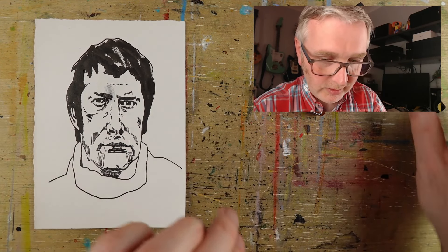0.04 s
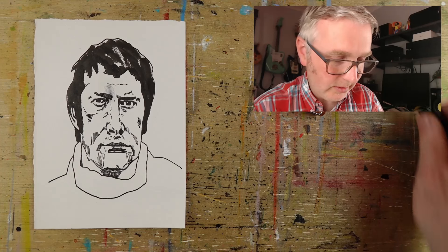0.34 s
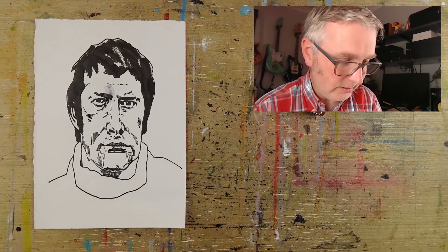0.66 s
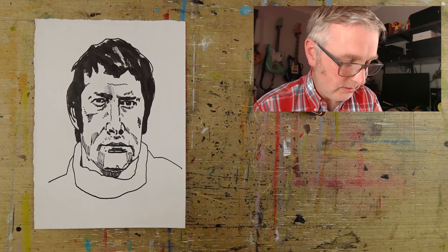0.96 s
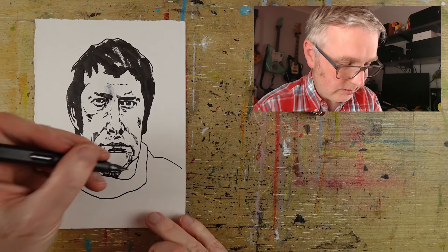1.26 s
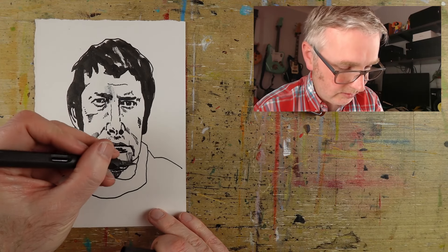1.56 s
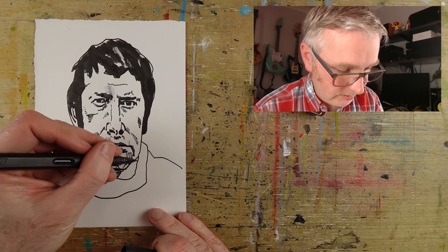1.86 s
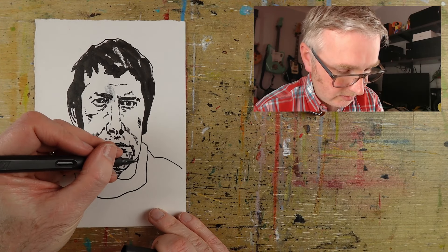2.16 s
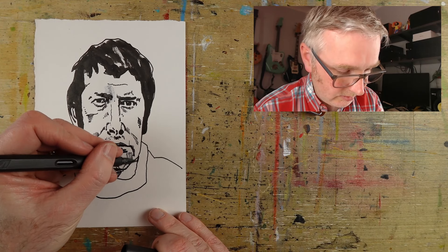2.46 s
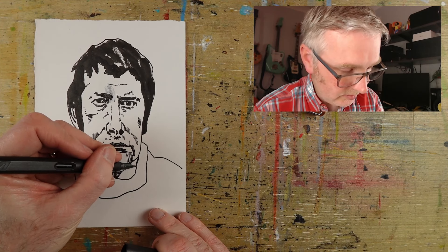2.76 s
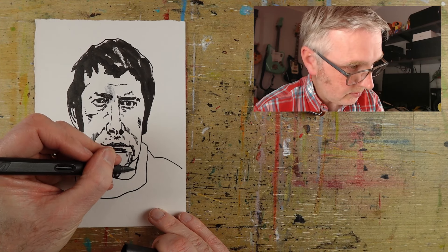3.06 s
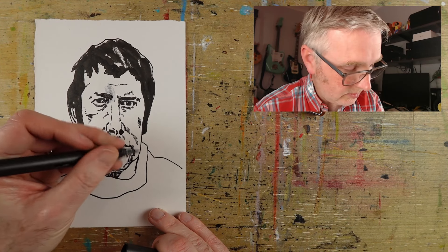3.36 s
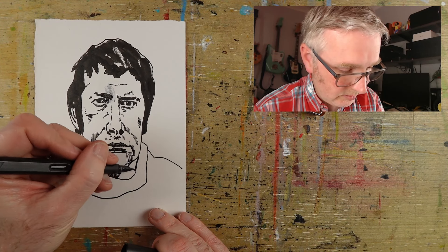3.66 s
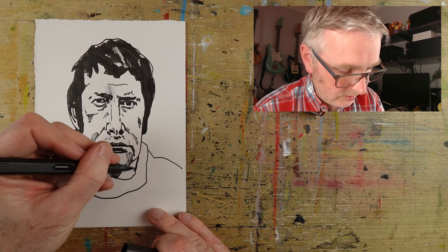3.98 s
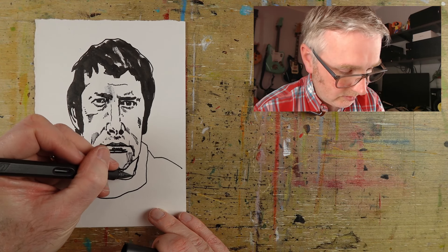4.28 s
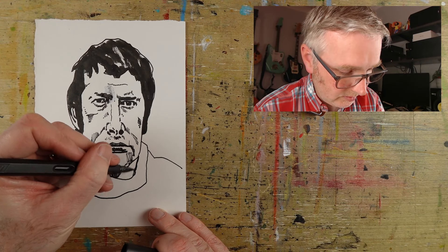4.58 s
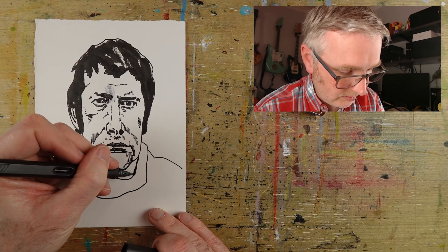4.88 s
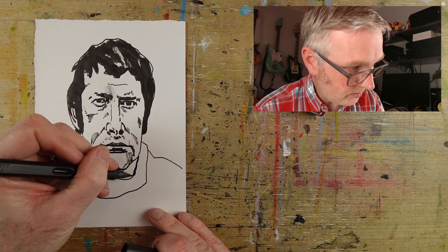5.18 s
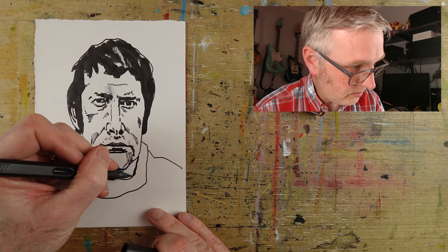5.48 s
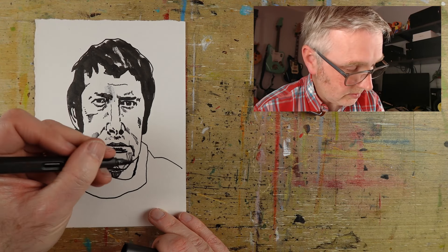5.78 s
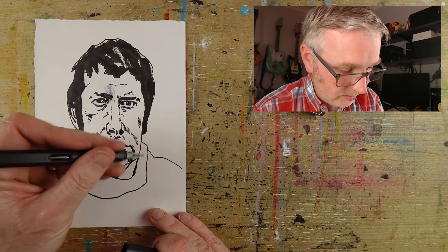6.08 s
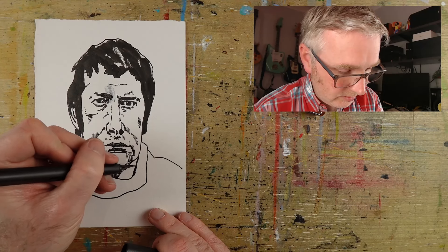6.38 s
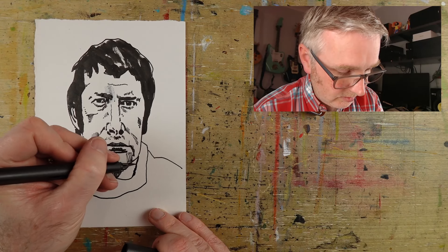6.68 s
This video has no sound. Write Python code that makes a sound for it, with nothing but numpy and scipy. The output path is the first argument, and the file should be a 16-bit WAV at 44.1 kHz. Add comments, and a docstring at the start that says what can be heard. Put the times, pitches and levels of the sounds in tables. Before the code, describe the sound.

Close by in a small, quiet room, a dropped pen bounces and rattles briefly on a wooden desk. Soft rustling of hands and small plastic clicks lead to the crisp snap of a pen cap coming off. Then the nib works on paper in brief, uneven scratches, mixed with soft knocks on the wood beneath. A clock ticks barely audibly over a low, steady room hush.

```python
"""A small quiet room with a wooden desk, a sheet of paper on it and a faintly ticking clock. A pen clatters
onto the desk, hands brush about, plastic clicks in the fingers and another pen is uncapped with a pop and its
cap set down. The hand settles on the sheet, then the nib lands and draws in short strokes: it catches on the
paper's fibres, and these tiny tugs make the desk top sound with it."""
import sys
import numpy as np
from scipy import signal
from scipy.fft import rfft, irfft
from scipy.io import wavfile

SR = 44100
rng = np.random.default_rng(int(sys.argv[2]) if len(sys.argv) > 2 else 0)


def to_wav(s):
    """Save 16-bit WAV."""
    ch = np.atleast_2d(s).T  # columns
    pcm = np.round(np.clip(ch, -1, 1) * 32767)  # PCM
    wavfile.write(sys.argv[1], SR, pcm.astype(np.int16))


N = 301644
TIME = np.arange(N) / SR

# A spectrum says how strong lows and highs are. A resonance is a pitch that a thing likes to ring at.
# the room's steady background: (frequency [Hz], level [dB])
ROOM_SPECTRUM = [(15, -68.5), (25, -22), (55, -7), (102, -3), (249, -7), (285, -4), (309, -15), (344, -12),
                 (560, -16), (911, -17), (988, -20.5), (2610, -17), (2840, -18), (3160, -21), (16000, -31)]
# pitches that stand out of it: (frequency [Hz], width [Hz], boost [dB])
ROOM_RESONANCES = [(73.3, 9.9, 7), (284, 50, 2), (2770, 130, 4.5), (4070, 400, 3), (5700, 540, 3.5)]
# hands and sleeves slide: (time [s], half width [s], soft rub level [dB], dry hiss level [dB])
HAND_MOVES = [(.02, 0.17, -69, -66.5), (.5, 0.13, -61, -62.5), (.615, 0.0057, -70, -59),
              (.646, 0.0095, -68, -49), (.92, .11, -63.5, -63), (1.12, 0.067, -74, -67.5),
              (1.33, 0.052, -67.5, -68.5), (1.917, .015, -68.5, -65.5), (2.915, .012, -68, -67),
              (3.331, 0.062, -68.5, -71.5), (5.92, 0.012, -66, -68), (5.991, 0.019, -59, -60.5),
              (6.165, 0.033, -67, -61), (6.27, 0.027, -71.5, -77)]
# rubbing skin and cloth: (frequency [Hz], level [dB])
RUB_SPECTRUM = [(290, -29), (500, -3), (919, -7), (1300, -9), (1720, -4.5), (5470, -5.5), (6510, -1.5),
                (13600, -7), (16000, -11.5)]
# the dropped pen hits the desk: (time [s], strength [dB])
BOUNCES = [(.154, -6.5), (.1621, -4), (.1642, 2.5), (.177, -5.5), (.186, -4), (.2006, -8), (.2045, -6.5),
           (.2162, -9.5), (.247, -22.5), (.271, -17.5)]
# the short crack of a bounce: (frequency [Hz], level [dB])
CRACK_SPECTRUM = [(29, -42.5), (50, -8.5), (75, -11), (163, -8.5), (345, -3), (507, -8.5), (927, -3),
                  (1120, -11), (1540, -7), (3500, -16.5), (3950, -14.5), (4240, -18), (16000, -38)]
# pen and desk ring on: (frequency [Hz], level [dB], time to fade by 60 dB [s])
BOUNCE_RINGS = [(71.6, -19, 0.77), (136.6, -26.5, 0.38), (254, -21, 0.37), (340.7, -12.5, 0.28),
                (474, -11.5, 0.21), (570, -8.5, 0.076), (639, -8.5, 0.1), (721, -8.5, 0.14),
                (799, -5, 0.099), (917, -14, 0.29), (940, -20, 0.14), (1037, 0, 0.091), (1056, -13, 0.06),
                (1398, -8, 0.14), (1540, -3, 0.044), (1644, -15, 0.098), (1925, -20.5, 0.076),
                (1958, -13.5, 0.084), (2286, -20.5, 0.19), (2550, -17.5, 0.12), (2680, -20, 0.1),
                (3240, -13, 0.065), (3980, -22, 0.13)]
# plastic clicks in the fingers, and the cap being set down near 1.0 s: (time [s], peak level [dB], centre
# frequency [Hz])
PEN_CLICKS = [(0.36, -45, 4600), (.3829, -50, 6600), (0.5821, -41, 8000), (0.758, -40.5, 3130),
              (0.774, -35, 5600), (0.9998, -34.5, 2630), (1.0224, -43, 3500), (1.0676, -46, 4000),
              (1.3192, -46, 4530), (1.3663, -46.5, 2500), (3.7807, -42.5, 6500), (5.699, -51, 9000)]
# the pen's plastic barrel: (frequency [Hz], width [Hz], boost [dB])
BARREL_RESONANCES = [(1490, 130, 10), (3160, 330, 7), (4520, 110, -2), (5730, 99, 8)]
# cap and barrel together: (frequency [Hz], level [dB])
CAP_SPECTRUM = [(470, -51), (800, -1), (1080, -11), (1730, 4.5), (3370, -2.5), (4480, -13), (5820, -6),
                (6750, -8), (15500, -9)]
# the desk top: (frequency [Hz], level [dB])
DESK_SPECTRUM = [(40, -24.5), (70, 3), (130, -2), (300, -1.5), (600, -7), (1000, -10.5), (1600, -11),
                 (2200, -23), (3500, -22.5), (4700, -31), (6000, -30), (8500, -30.5), (11000, -36.5),
                 (15000, -38)]
# the desk top and, higher up, the pen: (frequency [Hz], width [Hz], boost [dB])
DESK_RESONANCES = [(69.8, 8.5, 8.5), (118.4, 44, 9.5), (335.6, 45, 7.5), (519.4, 120, 9.5), (923, 48, 13.5),
                   (1312, 140, 9), (1694, 72, 9), (2404, 100, 12.5), (2720, 100, 4.5), (3260, 69, 5.5),
                   (3730, 150, 3), (5830, 350, 5), (6430, 93, 8), (6970, 120, 5.5), (7440, 130, 10),
                   (8520, 470, 5), (9800, 240, 1), (12080, 510, 10), (14200, 510, 9)]
# nib or hand lands on the desk: (time [s], peak level [dB], thud frequency [Hz])
LANDINGS = [(1.343, -46, 115), (1.426, -42, 260), (1.9737, -37.5, 192), (2.103, -42, 1100),
            (2.292, -48, 900), (2.412, -41.5, 1000), (2.634, -42, 149), (2.746, -40.5, 120),
            (3.006, -45.5, 148), (3.016, -41.5, 2000), (3.065, -45, 135), (3.125, -42, 159),
            (3.236, -45, 1300), (3.7907, -34, 89), (3.963, -32.5, 660), (4.234, -44.5, 574),
            (4.338, -46.5, 500), (4.499, -49.5, 550), (4.721, -49, 450), (5.032, -43, 400),
            (5.062, -40, 477), (5.093, -46, 400), (5.216, -41.5, 200), (5.296, -45, 350), (5.510, -45, 406),
            (6.7524, -38.5, 130)]
# nib strokes; rasp and hiss are counted from the level of the low drumming:
# (start [s], length [s], loudest point [0-1], level [dB], rasp [dB], hiss [dB])
NIB_STROKES = [(1.986, 0.033, 0.5, -59.5, -5.5, -18), (2.097, 0.11, 0, -60.5, 5, -6),
               (2.285, 0.081, 0.52, -56, 1.5, -8), (2.402, 0.15, 0.27, -58, 1, -7.5),
               (2.547, .13, 0.37, -64, -2.5, -10), (2.681, 0.079, 0, -61, -2.5, -10),
               (2.787, 0.068, 0.14, -56.5, -5.5, -10.5), (3.008, 0.074, 0.17, -62, -1, -8.5),
               (3.12, 0.054, 0.55, -60.5, -4, -11), (3.803, 0.1, 0.4, -54.5, -5.5, -9.5),
               (3.957, 0.058, 0.48, -49, -3.5, -14.5), (4.022, .088, 0.33, -50, -10, -12),
               (4.098, 0.086, 0, -56, -10.5, -16), (4.219, 0.059, 0.2, -64, 0.5, -14),
               (4.357, 0.062, 0.55, -53.5, -4, -22.5), (4.506, 0.073, 0.4, -48.5, -8.5, -12.5),
               (4.598, 0.079, .4, -57, -6.5, -8.5), (4.722, 0.081, 0.6, -47.5, -8, -16),
               (4.809, 0.11, 0.33, -50.5, -11.5, -14), (5.036, 0.071, 0.3, -62.5, -6, -17),
               (5.172, 0.054, 0.4, -58.5, -10, -15), (5.296, 0.032, 0.65, -54, -9, -27),
               (6.775, 0.041, 0.86, -61.5, -4, -8)]


def from_db(db):
    """Turn decibels into a number to multiply by."""
    return 10 ** (np.asarray(db) / 20)


def rms_one(x):
    """Scale a sound so that its average size (rms) is 1."""
    return x / np.sqrt(np.mean(x ** 2) + 1e-20)


def peak_one(x):
    """Scale a sound so that its peak is 1."""
    return x / np.abs(x).max()


def add(out, s, sound):
    """Mix a sound in at s seconds."""
    i = max(0, round(s * SR))
    out[i:i + len(sound)] += sound[:max(0, N - i)]


def keep_band(x, hz, kind, order=2):
    """Keep the "low" part, the "high" part or a middle "band" of a sound."""
    sections = signal.butter(order, np.clip(hz, 10, .45 * SR), kind, fs=SR, output="sos")
    return signal.sosfilt(sections, x + 1e-18)


def body(spectrum, resonances=(), size=16384):
    """How an object with this spectrum and these resonances answers one sharp tap."""
    f = np.maximum(np.arange(size // 2 + 1) * SR / size, 1)
    hz, level = np.transpose(spectrum)
    db = np.interp(np.log(f), np.log(hz), level)
    for centre, width, boost in resonances:
        db = db + boost / (1 + (2 * (f - centre) / width) ** 2)
    # turn the spectrum into a sound that never comes before the tap
    cepstrum = irfft(np.log(from_db(db)))[:size // 2]
    cepstrum[1:] *= 2
    return irfft(np.exp(rfft(cepstrum, size)))[:size // 2]


def through(x, response):
    """Pass a sound through a body."""
    return signal.fftconvolve(x, response)[:len(x)]


def fade(t60, size=SR // 4):
    """Die away by 60 dB every t60 seconds."""
    return from_db(-60 * TIME[:size] / t60)


def blow(scatter_db, t60):
    """One sharp hit, then the scattered waves that come back from the edges."""
    scatter = rng.standard_normal(SR // 4) * fade(t60)
    pulse = from_db(scatter_db) * scatter / np.linalg.norm(scatter)
    pulse[0] += 1
    return pulse


def waver(hz):
    """A random wobble of size 1, mostly slower than hz."""
    return rms_one(keep_band(rng.standard_normal(N), hz, "low"))


def catches(per_s, spread_db):
    """Friction: surfaces catch and let go at random, with uneven force."""
    force = from_db(spread_db * np.minimum(rng.exponential(1, N), 4)) * rng.choice([-1, 1], N)
    return force * (rng.random(N) < per_s / SR)


def room_tone(db):
    """The room's steady, low rush of noise."""
    return from_db(db) * rms_one(through(rng.standard_normal(N), body(ROOM_SPECTRUM, ROOM_RESONANCES)))


def swell(peak_s, width_s, roundness=0.93):
    """A hand speeds up and slows again; roundness 1 is pointed, 2 is bell-shaped."""
    return np.exp(-np.minimum(np.abs((TIME - peak_s) / width_s) ** roundness, 20))


def hands(desk, settle_s, settle_db, creep_db):
    """Skin and cloth brush over pen and paper; the settling hand makes the desk murmur."""
    rub = through(catches(per_s=14000, spread_db=4.5), body(RUB_SPECTRUM))
    soft = rms_one(keep_band(rub, 5400, "low", order=3))
    hiss = rms_one(keep_band(rub, 4740, "high", order=3))
    brushing = sum(swell(s, width) * (from_db(soft_db) * soft + from_db(hiss_db) * hiss)
                   for s, width, soft_db, hiss_db in HAND_MOVES)
    murmur = rms_one(keep_band(through(rng.standard_normal(N), desk), 850, "low"))
    settling = from_db(settle_db) * swell(settle_s, width_s=0.051)
    creeping = from_db(creep_db) * swell(settle_s, width_s=0.14)
    return brushing + murmur * (settling + creeping)


def rattle(count, gap_s=.0046, start_db=-10, db_per_s=-90):
    """Light, uneven touches die away after the first bounce: (time [s], strength [dB])."""
    chance = rng.uniform(-1, 1, (count, 2))
    delay = gap_s * (np.arange(count) + 1 + .35 * chance[:, 0])
    return np.column_stack([BOUNCES[0][0] + delay, start_db + db_per_s * delay + 3 * chance[:, 1]])


def dropped_pen(crack_db, ring_db):
    """Every bounce gives a dry crack and sets pen and desk ringing."""
    out = np.zeros(N)
    wood = body(CRACK_SPECTRUM, [(930, 240, 4.2)])   # one resonance makes the crack woody
    contacts = np.vstack([BOUNCES, rattle(count=13)])
    for s, db in contacts:
        crack = through(blow(scatter_db=3, t60=.09), wood) / np.linalg.norm(wood)
        treble_hz = 10500 * from_db(db) ** 0.11   # weaker bounces are duller
        crack = keep_band(crack, treble_hz, "low", order=1)
        add(out, s, rng.choice([-1, 1]) * from_db(db + crack_db) * crack)
    times, strength_db = contacts.T
    samples = np.round(times * SR).astype(int)
    for hz, db, t60 in BOUNCE_RINGS:
        pushes = np.bincount(samples, from_db(strength_db) * rng.choice([-1, 1], len(times)), SR)
        note = fade(t60, size=SR) * np.sin(2 * np.pi * hz * TIME[:SR])
        ringing = through(pushes, note)
        ringing *= np.linalg.norm(note) / np.linalg.norm(ringing)   # each note gets a set energy
        add(out, 0, from_db(db + ring_db) * ringing)
    return out


def clock(first_s, ring_hz, t60, tick_db, tock_db):
    """The clockwork clicks and pings once a second, tick and tock in turn."""
    out = np.zeros(N)
    ping = np.sin(2 * np.pi * ring_hz * TIME[:SR // 4]) * fade(t60)
    for k, s in enumerate(np.arange(first_s, N / SR, 1)):
        click = peak_one(keep_band(blow(scatter_db=22, t60=0.048), [5000, 13000], "band"))
        add(out, s, from_db(tock_db if k % 2 else tick_db) * (ping + .8 * click))
    return out


def pen_clicks():
    """Small, hard touches make the plastic barrel ring for an instant."""
    out = np.zeros(N)
    barrel = body([(500, 0), (16000, 0)], BARREL_RESONANCES)
    for s, db, hz in PEN_CLICKS:
        touch = keep_band(blow(scatter_db=-4.5, t60=0.023), [hz / 2.05, hz * 1.7], "band")
        add(out, s, from_db(db) * peak_one(through(touch, barrel)))
    return out


def uncapping(pop_s, off_s, pop_hz, squeak_hz, pop_db, snap_db, scrape_db, squeak_db):
    """Air pops into the cap, its catch snaps, and it scrapes off the barrel with a last squeak."""
    out, cap = np.zeros(N), body(CAP_SPECTRUM)
    pop = -np.sin(2 * np.pi * pop_hz * TIME[:SR // 4]) * fade(t60=0.0061)
    add(out, pop_s, from_db(pop_db) * peak_one(keep_band(pop, [170, 750], "band", order=1)))
    snap = peak_one(through(blow(scatter_db=5.5, t60=0.026), cap))
    add(out, pop_s + 0.00119, from_db(snap_db) * snap)
    sliding = keep_band(1. * ((TIME > pop_s) & (TIME < off_s)), 160, "low", order=1)
    scrape = rms_one(through(catches(per_s=7300, spread_db=0.5), cap))
    squeak = np.sin(2 * np.pi * squeak_hz * TIME + 0.91 * waver(hz=300))
    squeak *= np.exp(-np.abs(TIME - off_s + 0.0038) / 0.003)   # loudest just before the cap is off
    return out + sliding * (from_db(scrape_db) * scrape + from_db(squeak_db) * squeak)


def desk_taps(desk):
    """Nib or hand pushes the desk top in; a softer landing has a deeper thud and less treble."""
    out = np.zeros(N)
    for s, db, thud_hz in LANDINGS:
        treble_hz = 1190 * (thud_hz / 355) ** 0.59
        push = keep_band(blow(scatter_db=-6.5, t60=0.2), treble_hz, "low")
        knock = keep_band(push, 0.14 * thud_hz, "high", order=1)
        thud = keep_band(push, [thud_hz / 1.6, thud_hz * 1.67], "band", order=1)
        add(out, s, -from_db(db) * peak_one(through(knock + thud, desk)))
    return out


def stroke_shape(n, loudest, edge_db=-8.5, touch_s=0.0041, lift_s=0.0059):
    """Loudness over n samples: the nib takes hold, swells, eases and lifts."""
    t = TIME[:n]
    from_peak = np.interp(t / t[-1], [0, np.clip(loudest, .02, .98), 1], [1, 0, 1])
    arch = from_db(edge_db * from_peak ** 2.2)
    return arch * np.minimum(t / touch_s, 1) * np.minimum((t[-1] - t) / lift_s, 1)


def nib_scratching():
    """Coarse catches on the paper's fibres drum on the desk and rasp in the nib; fine ones hiss."""
    grip = from_db(2.5 * waver(hz=35.6))   # the fingers press unevenly
    roughness = waver(hz=68)   # rough and smooth patches pass under the nib
    coarse = catches(per_s=1300, spread_db=2.2) * from_db(1.6 * roughness)
    fine = catches(per_s=9000, spread_db=2.5) * from_db(2 * roughness)
    drumming = keep_band(coarse, [92, 750], "band", order=3)
    rasp = keep_band(coarse, [750, 2000], "band", order=3)
    bright_rasp = keep_band(coarse, [2000, 4500], "band", order=3)
    hiss = keep_band(fine, [4500, 17000], "band", order=3)
    out = np.zeros(N)
    for start, length, loudest, level_db, rasp_db, hiss_db in NIB_STROKES:
        i, n = round(start * SR), round(length * SR)
        shape = stroke_shape(n, loudest)[:N - i] * grip[i:i + n]
        # each spot on the desk favours its resonances differently
        resonances = [(hz, width, boost + rng.normal(0, 2.3)) for hz, width, boost in DESK_RESONANCES]
        spot = body(DESK_SPECTRUM, resonances)
        bright_db = (rasp_db + hiss_db) / 2 - 2.5   # a hissing stroke also rasps more brightly
        layers = [(drumming, 0, shape), (rasp, rasp_db, shape), (bright_rasp, bright_db, shape),
                  (hiss, hiss_db, shape ** 1.36)]   # the hiss swells more steeply
        for force, db, loudness in layers:
            scratch = signal.fftconvolve(force[i:i + n] * loudness, spot)
            scratch *= np.sqrt(n) / np.linalg.norm(scratch)
            add(out, start, from_db(level_db + db - 1.65) * scratch)
    return out


def wall_echo(x, t60, echo_db, treble_hz):
    """The walls add a short, faint tail to a sound."""
    n = SR // 2
    tail = rng.standard_normal(n) * fade(t60, size=n) * (TIME[:n] > .006)
    tail = keep_band(tail, treble_hz, "low", order=1)
    return x + from_db(echo_db) * through(x, tail / np.linalg.norm(tail))


def scene():
    """The desk sounds and the clock echo in the room, over its steady background."""
    desk = body(DESK_SPECTRUM, DESK_RESONANCES)
    background = room_tone(db=-66)
    sound = hands(desk, settle_s=1.43, settle_db=-59.5, creep_db=-67.5)
    sound += dropped_pen(crack_db=-5.5, ring_db=-23.5)
    sound += clock(first_s=.1642, ring_hz=6130, t60=0.05, tick_db=-60.5, tock_db=-62.5)
    sound += pen_clicks()
    sound += uncapping(pop_s=.7995, off_s=.8255, pop_hz=420, squeak_hz=5840,
                       pop_db=-21, snap_db=-16, scrape_db=-44.5, squeak_db=-35)
    sound += desk_taps(desk)
    sound += nib_scratching()
    sound = wall_echo(sound, t60=0.2, echo_db=-17, treble_hz=4500)
    return (keep_band(sound, 48, "high") + background)[None]


def record(dry):
    """Cut away the highest treble, above 15900 Hz."""
    return signal.sosfilt(signal.ellip(10, .1, 70, 15900, fs=SR, output="sos"), dry)


dry = scene()
out = record(dry)
to_wav(out)
```